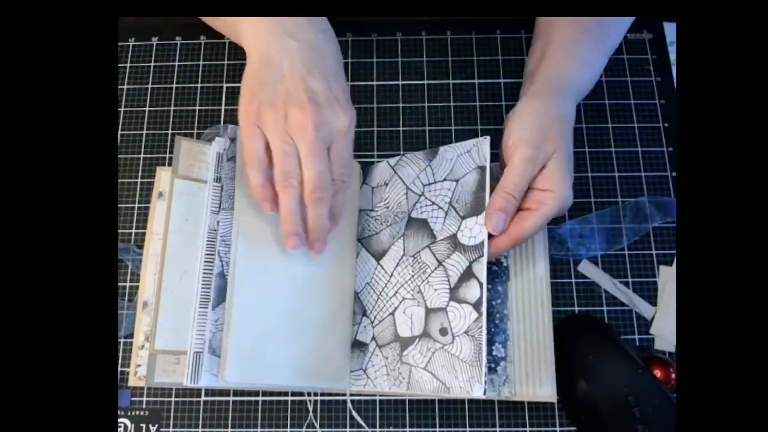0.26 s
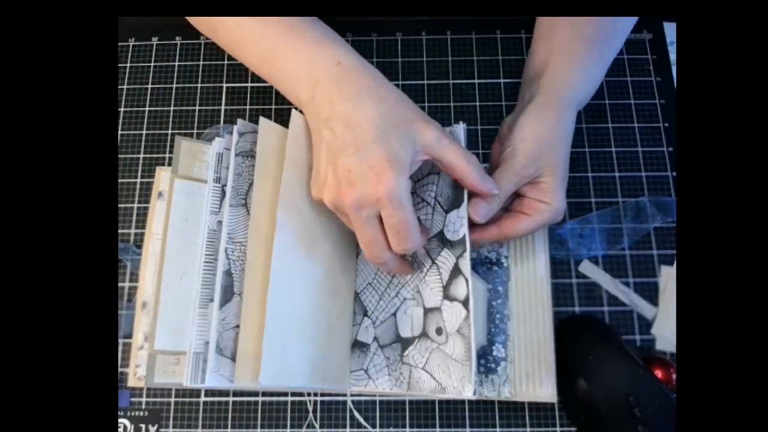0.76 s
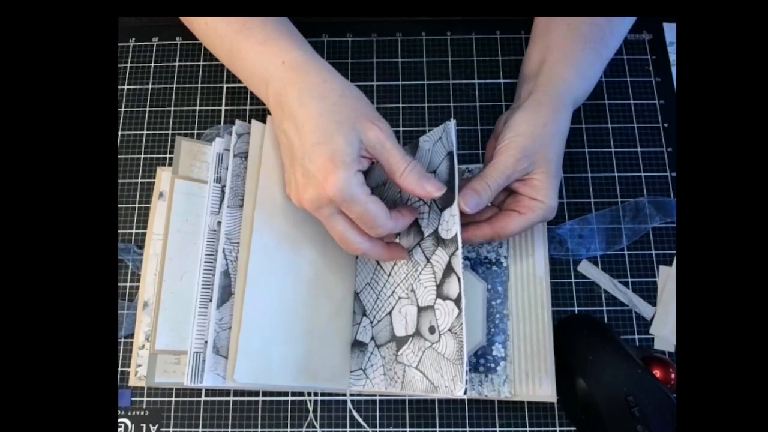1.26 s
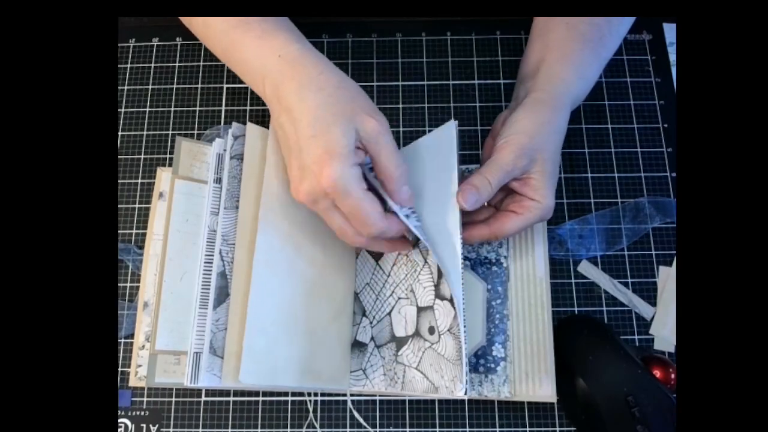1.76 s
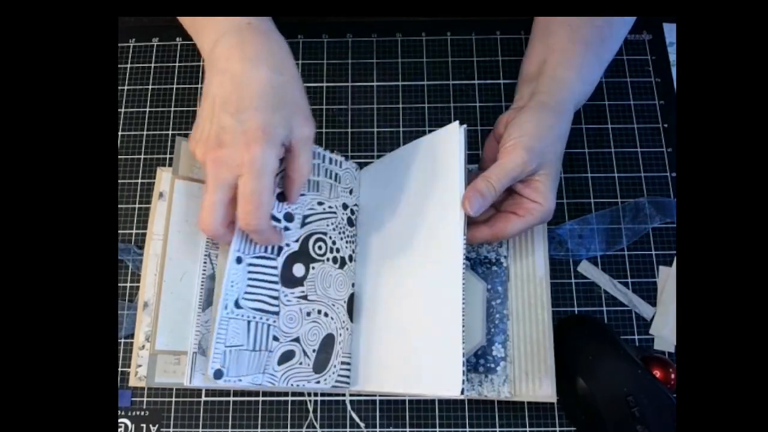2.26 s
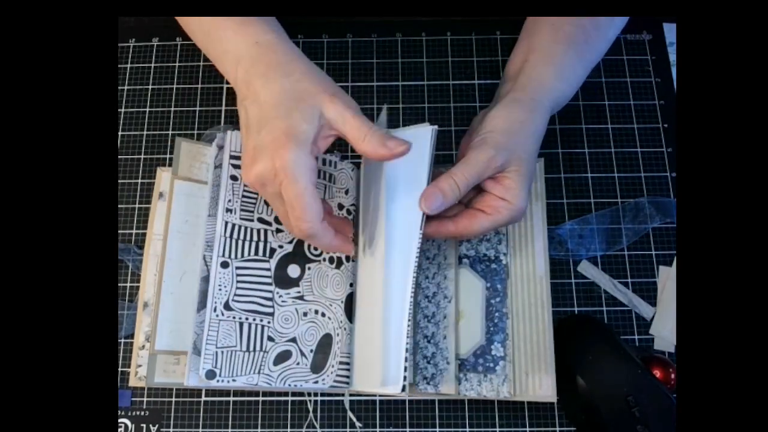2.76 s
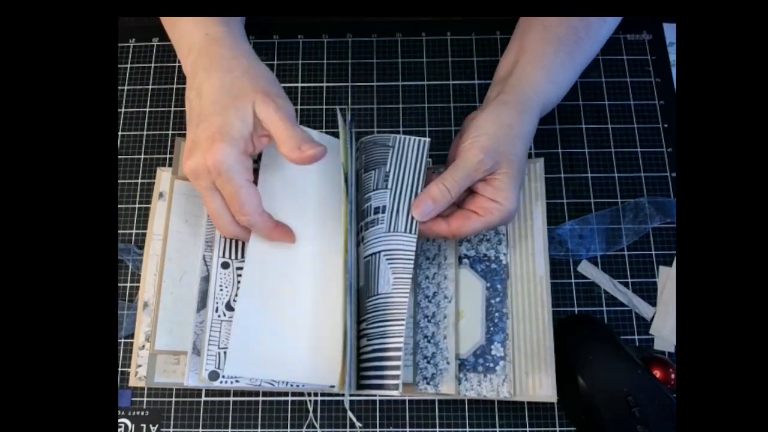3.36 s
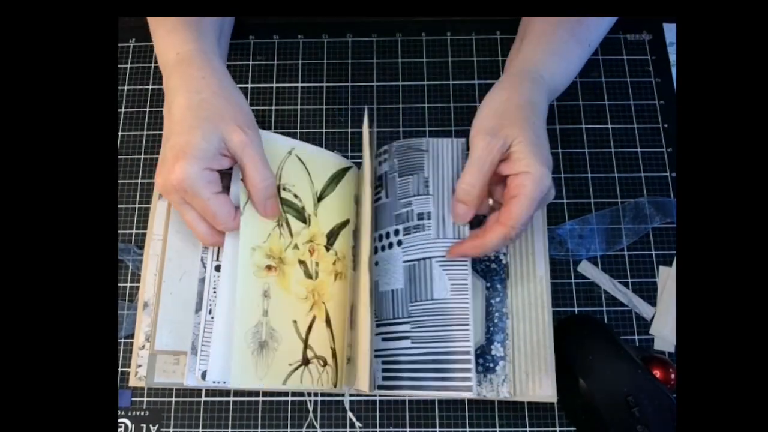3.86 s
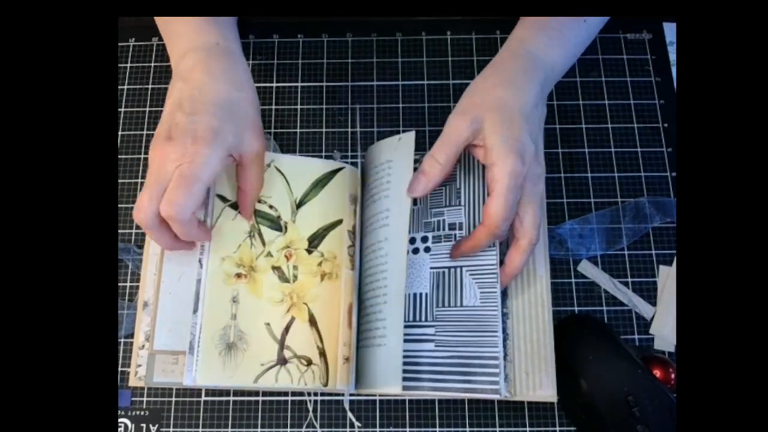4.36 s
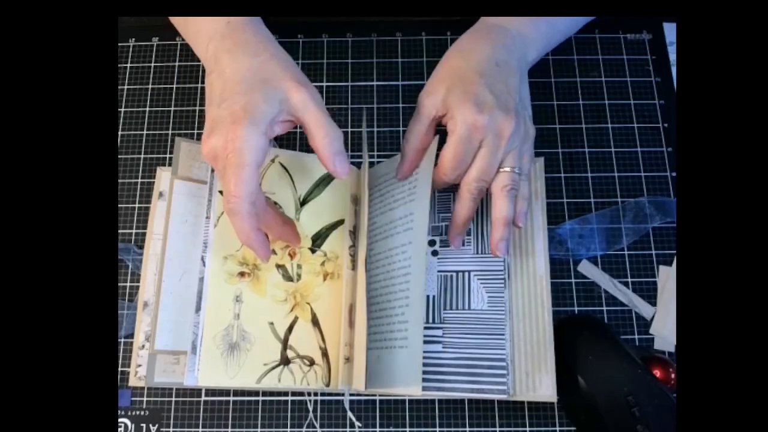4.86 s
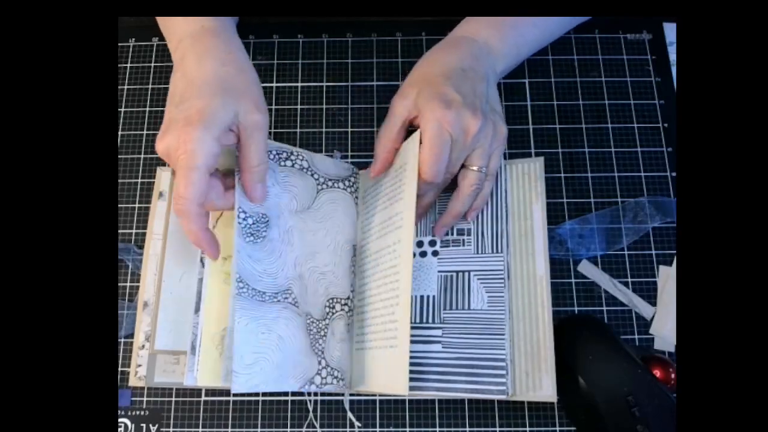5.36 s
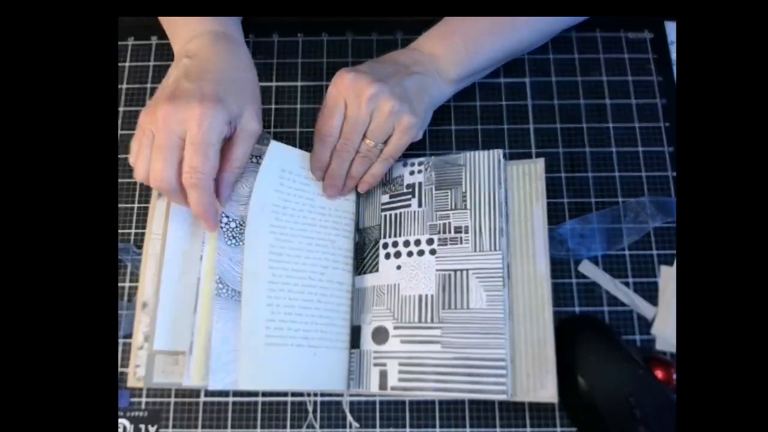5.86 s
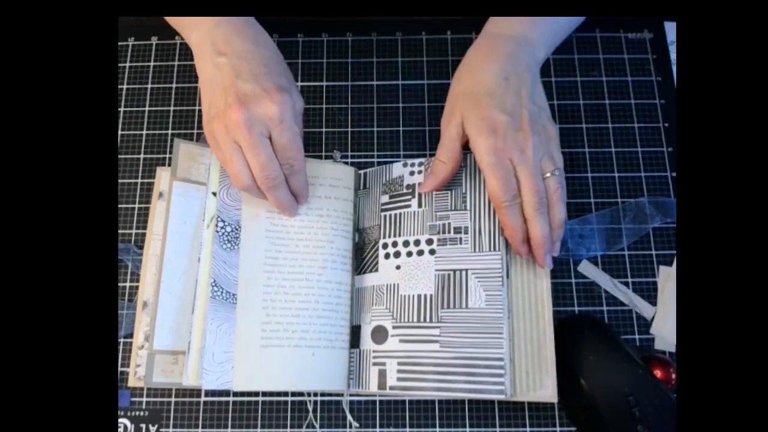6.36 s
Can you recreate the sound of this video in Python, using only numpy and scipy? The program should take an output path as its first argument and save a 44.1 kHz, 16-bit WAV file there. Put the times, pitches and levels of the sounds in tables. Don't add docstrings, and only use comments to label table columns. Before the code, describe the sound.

Stiff paper pages slide, crackle and flap in uneven bursts under a close small microphone, with sharp crease snaps and light fingertip ticks.

```python
import sys
import numpy as np
from scipy import signal
from scipy.fft import rfft, irfft, next_fast_len
from scipy.io import wavfile
from scipy.ndimage import uniform_filter1d

SR = 44100
rng = np.random.default_rng(int(sys.argv[2]) if len(sys.argv) > 2 else 0)


def output_pcm(signal):
    pcm = np.clip(np.atleast_2d(signal).T, -1, 1) * 32767
    wavfile.write(sys.argv[1], SR, np.round(pcm).astype(np.int16))


def gain_from_db(level_db):
    decades = np.asarray(level_db, float) / 20
    return 10 ** decades


N = 291501


def evened(x):
    return x / np.sqrt(np.mean(x ** 2) + 1e-20)


def read(points, hz):
    f, value = np.transpose(points)
    return np.interp(np.log(hz + 1), np.log(f + 1), value)


def ring(x, hz, width_hz):
    return signal.lfilter(*signal.iirpeak(hz, hz / width_hz, SR), x)


def steep(x, hz, width_hz):
    y = ring(ring(x, hz, width_hz), hz, width_hz)
    return y / abs(y).max()


def drift(length, size):
    wander = uniform_filter1d(rng.standard_normal(length), size)
    return evened(uniform_filter1d(wander, size))


def blotches(shape, bins, frames):
    patches = uniform_filter1d(rng.standard_normal(shape[::-1]).T, bins, axis=0)
    return evened(uniform_filter1d(patches, frames, axis=1))


def delayed(x, s):
    size = next_fast_len(N + 512)
    turn = np.exp(-2j * np.pi * np.fft.rfftfreq(size, 1 / SR) * s)
    return irfft(rfft(x, size) * turn, size)[..., :N]


def add(mix, s, sound):
    part = mix[round(s * SR):][:len(sound)]
    part += sound[:len(part)]


# t/s, sliding level/dB, sheet body level/dB, flap level/dB,
# fizz level/dB, microphone port whistle level/dB, pitch of the gap between pages f/Hz
STROKES = [
    [(0.0, -24.5, -37, -56, -34.5, 3.5, 4700), (0.042, -21, -44, -58, -22, -10, 4990),
     (0.126, -35, -31, -50, -48.5, -5, 4850), (0.244, -33, -58, -57.5, -54.5, -12, 4440),
     (0.34, -28.5, -47.5, -62, -54, -7, 4850)],
    [(0.355, -46, -66, -69, -58, -2, 5120), (0.41, -48, -66, -72, -65, -4, 5150)],
    [(0.425, -42, -53, -62, -53, 3, 5230), (0.489, -38.5, -56, -59.5, -48, 0, 5230),
     (0.56, -41, -57, -69, -50, -3, 5320)],
    [(0.575, -61.5, -68, -81, -72, 12, 4690), (0.793, -59, -72, -72, -70, -4, 4740),
     (0.961, -51.5, -72, -69.5, -69.5, 2, 4400), (1.079, -52, -65, -63, -62, 2, 4350),
     (1.195, -70, -79, -80, -76, -3, 4350), (1.281, -58, -74, -77, -79, 3, 4750),
     (1.433, -54.5, -77, -74, -85.5, 11, 4500), (1.67, -66, -79, -71.5, -73, 3.5, 4720)],
    [(1.69, -66, -81, -74, -70.5, 13.5, 5040), (1.746, -30, -61.5, -60, -53.5, -5, 5280),
     (1.856, -24, -44, -58, -30.5, -18, 5050), (1.906, -18.5, -39.5, -43.5, -41, -11, 4650),
     (1.974, -22, -26.5, -38, -32.5, -19, 4860), (2.072, -24.5, -36, -39.5, -36, -3, 4730),
     (2.152, -33, -45.5, -44, -46, -13, 4400), (2.264, -28, -48, -54, -42.5, -12.5, 4800),
     (2.405, -24, -34, -48, -48.5, -5, 5200)],
    [(2.425, -46, -56, -60.5, -64.5, -2.5, 4700), (2.513, -50.5, -63, -57.5, -73, 1, 4560),
     (2.605, -57, -70, -67, -72.5, -9, 4760), (2.731, -60.5, -84, -85, -86, 5.5, 4800),
     (2.933, -61.5, -66.5, -53.5, -84, 7, 4880), (2.99, -44, -63, -61, -59, 1, 4770)],
    [(3.02, -51, -60, -45, -66, 10, 5010), (3.058, -17, -41, -49, -54, -24.5, 5300),
     (3.124, -39, -52.5, -63, -68, 20, 5520), (3.206, -42.5, -62, -59, -65, 10, 4700),
     (3.32, -55, -64, -67, -71.5, 14, 4650)],
    [(3.34, -48, -56, -71, -74, 10, 4700), (3.43, -40, -48, -70, -63, 6, 4530),
     (3.48, -56, -56, -70, -62, 20, 4700)],
    [(3.5, -49.5, -70.5, -78, -78.5, 4, 4630), (3.66, -57, -88, -69, -71, 14, 4620)],
    [(3.7, -30.5, -32, -33, -65, -4, 4440), (3.722, -22.5, -40, -40, -84, 2.5, 4500),
     (3.81, -28.5, -49, -55, -52, -5, 4960), (3.842, -28, -54, -54.5, -50, -8, 4940),
     (4.0, -37.5, -52.5, -59.5, -56.5, 14, 4350), (4.096, -36.5, -48, -55, -55.5, 2, 4840),
     (4.278, -35.5, -47, -67, -45, 4.5, 4950), (4.394, -29.5, -43, -38.5, -41, 8, 4600),
     (4.43, -37, -54, -49, -71, 9, 4640)],
    [(4.45, -45, -68, -63, -75, 3, 4740), (4.56, -47.5, -59, -55, -74, -7, 4530)],
    [(4.575, -37, -40.5, -42, -57, 17, 4600), (4.641, -33, -43, -47.5, -54, -4, 4370),
     (4.745, -27.5, -53, -44.5, -52, -9, 4940), (4.817, -28.5, -61, -64, -49, -4, 5340),
     (4.933, -33.5, -76, -72, -50, -10, 5590), (5.019, -47, -70, -62.5, -63.5, -2, 4620),
     (5.297, -59.5, -65.5, -73, -62.5, 25, 4620), (5.405, -33, -47, -58, -42.5, -7, 4870),
     (5.459, -23.5, -44, -62, -41, -4, 4520), (5.577, -24.5, -47, -68, -47.5, -5, 4600),
     (5.657, -38, -47.5, -76, -54, 12, 4450), (5.847, -18.5, -43.5, -51, -43, 1, 4650),
     (5.941, -26.5, -45.5, -59, -28, -3, 4800), (6.027, -52, -44, -59, -73, -1, 4640),
     (6.143, -46, -62, -66, -70, 7, 4360), (6.19, -37.5, -54, -55, -69, -1.5, 4330)],
    [(6.21, -63, -75.5, -71, -72, 14, 4630), (6.468, -69.5, -71, -74, -84, 21.5, 4580),
     (6.61, -62, -84, -83, -79, 15, 4670)],
]
# f/Hz, level/dB (per Hz)
PAPER_RESPONSE = [(120, -29.5), (300, -11.5), (700, -0.5), (1050, 2), (1400, 4), (2300, 6.5), (3200, 7),
                  (3700, -2), (4500, 0), (5200, -1.5), (6000, 0), (6800, 13.5), (8000, -7)]


def rustle(hump_db=7.5):
    slips = rng.standard_normal(N) * gain_from_db(1.2 * drift(N, size=200))
    hz, t, z = signal.stft(evened(slips), SR, nperseg=256, noverlap=192)
    s, *columns = np.transpose(sum(STROKES, []))
    slide_db, body_db, flap_db, fizz_db, whistle_db, gap_hz = (np.interp(t, s, c) for c in columns)

    flap = read([(1300, 1), (2000, 0)], hz)
    fizz = read([(5600, 0), (6600, 1)], hz)
    slide = read([(3200, 0), (4000, 1)], hz) - fizz
    body = 1 - flap - fizz - slide
    port = np.exp(-((hz - 4660) / 200) ** 2)
    field_db = np.outer(slide, slide_db) + np.outer(body, body_db) + np.outer(flap, flap_db)
    field_db += np.outer(fizz, fizz_db) + np.outer(port, whistle_db)
    field_db += hump_db * np.exp(-((hz[:, None] - gap_hz) / 600) ** 2)

    grains = 2.2 * blotches(z.shape, bins=10, frames=2)
    patches = 2.8 * blotches(z.shape, bins=3, frames=36)
    field_db += (1 - .6 * port[:, None]) * (grains + patches)
    z = z * gain_from_db(field_db + read(PAPER_RESPONSE, hz)[:, None] + 3)
    return signal.istft(z, SR, nperseg=256, noverlap=192)[1][:N]


# t/s, peak level/dB, ring f/Hz, body f/Hz, body level/dB, t60/s
CREASES = [(0.032, -4.5, 4350, 3360, -36, 0.056), (0.0381, -1.5, 5400, 3360, -33, 0.043),
           (0.0564, -22, 5200, 3350, -8, 0.04), (0.0854, 5.5, 5000, 2200, -11, 0.015),
           (0.0917, -1, 4840, 2200, -5, 0.036), (0.0996, -0.5, 4240, 2770, -6.5, 0.059),
           (0.1174, -20.5, 5000, 2280, 5, 0.037), (0.2304, -26, 5140, 3400, -21, 0.03),
           (0.2875, -15, 4420, 3230, -30, 0.051), (0.3033, -20, 5400, 1930, -21, 0.048),
           (0.3273, -18.5, 5230, 3330, -31, 0.035), (0.4202, -26, 5900, 3150, -23, 0.04),
           (0.4484, -25, 5200, 2874, -25.5, 0.042), (0.5173, -26.5, 5400, 3340, -17, 0.046),
           (0.7346, -18.5, 5020, 3360, -20, 0.058), (0.9533, -35, 4330, 2880, -22.5, 0.027),
           (1.0873, 6, 4330, 3600, -21, 0.031), (1.6847, -15.5, 4770, 2800, -18, 0.02),
           (1.695, -11, 4770, 2800, -19, 0.037), (1.7073, -18, 4850, 2770, -9, 0.084),
           (1.7353, -6, 4860, 3130, -12, 0.091), (1.7653, -4.5, 4960, 3030, -23, 0.055),
           (1.7722, -7, 4760, 3410, -15, 0.044), (1.893, -11.5, 4300, 3370, -27, 0.027),
           (1.9205, -11.5, 5270, 2830, -10, 0.053), (1.9368, -15, 4250, 2740, -2, 0.034),
           (1.9872, 4.5, 4500, 2280, -15, 0.039), (2.0178, 0.5, 4620, 3440, -17, 0.047),
           (2.0234, -1, 4750, 2260, -14.5, 0.043), (2.045, -10, 5100, 2840, -13, 0.04),
           (2.0787, -15, 5300, 1410, -24, 0.032), (2.1123, -6, 4300, 2230, -10, 0.071),
           (2.3776, -9, 5200, 3390, -16, 0.046), (2.4035, -15, 5100, 2330, -25.5, 0.047),
           (2.449, -56, 5150, 3390, -2, 0.04), (2.4636, -31, 4520, 3270, -0.5, 0.039),
           (2.9311, -10, 4690, 2480, -19.5, 0.064), (2.9628, -23.5, 4340, 2410, -18, 0.035),
           (3.0131, -27.5, 4150, 2170, -5, 0.12), (3.0968, -4, 5640, 3500, -24.5, 0.029),
           (3.2131, -29, 4630, 3290, -20, 0.043), (3.247, -26.5, 4610, 2420, -20, 0.046),
           (3.361, -29, 4530, 3500, -25, 0.047), (3.3997, -25, 4630, 3200, -12, 0.032),
           (3.7224, -14, 4400, 3360, -3.5, 0.064), (3.7598, -13, 5380, 2920, -19, 0.067),
           (3.8778, -15.5, 5100, 3380, -35, 0.036), (4.285, -18.5, 4610, 2440, -25, 0.046),
           (4.3297, -11, 4640, 3260, -14, 0.049), (4.3411, -5, 4730, 2860, -16, 0.037),
           (4.371, -7, 4600, 2760, -21.5, 0.069), (4.4009, -12, 4780, 3460, -31, 0.036),
           (4.4618, -49, 5170, 3600, -19, 0.04), (4.6034, -20, 4600, 3350, -5.5, 0.04),
           (4.6664, -13.5, 4420, 1910, -17.5, 0.038), (4.6972, -21.5, 5160, 1950, -12, 0.046),
           (4.7105, -13.5, 4360, 1920, -10, 0.035), (4.8923, -25.5, 5780, 3420, -41.5, 0.046),
           (4.9909, -25.5, 4600, 1900, -28, 0.039), (5.241, -27.5, 4700, 3290, -24.5, 0.045),
           (5.2615, -24.5, 4800, 1840, -20, 0.046), (5.2802, -17.5, 4680, 1830, -17, 0.05),
           (5.443, -26, 4330, 3400, -15, 0.036), (5.4748, -21, 4600, 3420, -26, 0.044),
           (5.6959, -15, 4430, 3270, -31, 0.042), (5.7445, -14, 4340, 3350, -30, 0.063),
           (5.8142, -10.5, 4720, 3520, -19, 0.042), (5.8387, -13, 4900, 2430, -26, 0.052),
           (5.9337, -8.5, 5470, 3700, -19.5, 0.053), (5.9568, 2, 4340, 3440, -4.5, 0.032),
           (6.1552, -17.5, 4450, 2720, -13, 0.053)]


def crumples(thump_db=-20, fizz_db=-16, spread_db=-8, rise=.05):
    out, t = np.zeros(N), np.arange(6000) / SR
    noises = rng.standard_normal((len(CREASES), 6000))
    for (s, db, hz, body_hz, body_db, t60), noise in zip(CREASES, noises):
        t60 = max(t60, .005)
        swell = (1 - np.exp(-t / (rise * t60))) ** 2
        drive = noise * gain_from_db(-60 * t / t60) * swell
        top = steep(drive, hz, 1100)
        top = top + gain_from_db(spread_db) * steep(drive, 5000, 2800) + gain_from_db(fizz_db) * steep(drive, 7310, 1500)
        body = steep(drive, body_hz, 900)
        body = body + gain_from_db(spread_db) * steep(drive, 2200, 2000) + gain_from_db(thump_db) * steep(drive, 700, 300)
        add(out, s - rise * t60, gain_from_db(db - 5.5) * (top + gain_from_db(body_db + 7.5) * body))
    return out


# t/s, peak level/dB, ring f/Hz, body level/dB, knock level/dB, ring time t/s
FINGER_TAPS = [(0.7427, -1.5, 4750, -46, -65, 0.00072), (1.0077, -7.5, 4420, -22, -29, 0.0017),
               (1.0243, -3, 4290, -42, -29.5, 0.0017), (1.0543, -15.5, 4120, -19, -31, 0.0013),
               (1.0719, -10.5, 4250, -18, -24.5, 0.00097), (1.0712, -5.5, 4360, -20, -24.5, 0.0021),
               (1.4017, -21, 4490, -16.5, -16, 0.0011), (2.6703, -45, 4870, -11.5, -0.5, 0.0016),
               (2.8879, -4, 4830, -37, -49.5, 0.001), (2.9978, -16, 4600, -16.5, -29, 0.0014),
               (3.6427, -31, 4450, -21, -38, 0.0013), (3.668, -10.5, 4150, -20, -38, 0.0016),
               (3.693, -7.5, 4370, -10.5, -26.5, 0.0015), (4.5148, -26, 5070, -4, -42, 0.0016),
               (4.57, -9.5, 4420, -18.5, -27.5, 0.0015), (6.0746, -9.5, 4400, -34.5, -24.5, 0.0027),
               (6.0918, -7.5, 4310, -39, -27, 0.0022), (6.1389, -9.5, 4260, -50, -19, 0.0021),
               (6.4034, -13, 4380, -26.5, -28.5, 0.0021), (6.4182, -12.5, 4370, -51, -24.5, 0.0026)]


def taps(scatter=0.11, t60=0.024):
    lead = 130
    out, t = np.zeros(N), np.arange(4096) / SR
    scrape = 0.78 * (t * SR / lead) ** 2
    decay = gain_from_db(-60 * (t - lead / SR) / t60)
    envelope = np.where(t < lead / SR, scrape, decay)
    noises = rng.standard_normal((len(FINGER_TAPS), 4096))
    for (s, db, hz, body_db, knock_db, ring_s), noise in zip(FINGER_TAPS, noises):
        drive = scatter * noise * envelope
        drive[lead] = 1
        knock = steep(drive, 640, 150) + .7 * steep(drive, 920, 200)
        width_hz = 2.2 / max(ring_s, .0005)
        cavity = steep(ring(ring(drive, hz, width_hz), hz, width_hz), hz, width_hz)
        tap = cavity + gain_from_db(-31) * steep(drive, 7000, 670) + gain_from_db(body_db) * steep(drive, 2190, 870)
        add(out, s - lead / SR, gain_from_db(db - 1.0) * (tap + gain_from_db(knock_db) * knock))
    return out


# t/s, peak level/dB
WRIST_BUMPS = [(0.08, -32), (0.485, -48), (1.982, -48), (2.416, -58.5), (2.693, -37.5), (2.793, -36.5),
               (3.142, -56), (3.688, -53), (4.6, -39), (5.371, -52), (5.71, -49), (5.939, -38),
               (6.101, -36), (6.395, -39.5)]


def bumps(t60=.12):
    out, t = np.zeros(N), np.arange(8000) / SR
    noises = rng.standard_normal((len(WRIST_BUMPS), 8000))
    for (s, db), noise in zip(WRIST_BUMPS, noises):
        push = noise * gain_from_db(-60 * t / t60)
        add(out, s, gain_from_db(db - 2.5) * steep(push, 140, 160))
    return out


def desk(x, t60=0.33, wet_db=-16):
    t = np.arange(8000) / SR
    tail = rng.standard_normal(8000) * gain_from_db(-60 * t / t60) * (t > .003)
    return x + gain_from_db(wet_db) * signal.fftconvolve(x, tail / np.linalg.norm(tail))[:N]


# f/Hz, level/dB (per Hz)
ROOM_TONE = [(20, -6.5), (100, -4), (300, -12), (600, -25), (1400, -29), (3400, -37), (4200, -27),
             (4700, -11.5), (5300, -49), (7800, -32.5), (10800, -34.5), (11500, -45.5), (15500, -46.5),
             (16500, -77.5)]


def air(level_db=-50):
    hz, t, z = signal.stft(rng.standard_normal((N, 2)).T, SR, nperseg=2048)
    z = z * gain_from_db(read(ROOM_TONE, hz))[:, None]
    common, difference = signal.istft(z, SR, nperseg=2048)[1][:, :N]
    return gain_from_db(level_db - 6) * evened(common + .06 * difference * np.array([[1], [-1]]))


def scene(edge_hz=8050, port_delay_s=1.55e-5):
    paper = desk(rustle() + taps() + crumples()) + bumps()
    band = signal.firwin(201, edge_hz, window=("kaiser", 9), fs=SR)
    paper = signal.oaconvolve(paper, band, "same")
    left, right = paper + air()
    return np.array([left, delayed(right, port_delay_s)])


def low_pass(x):
    return signal.sosfilt(signal.butter(12, 15900, fs=SR, output="sos"), x)


def record(dry, copy_s=34 / 16000):
    combed = dry + delayed(dry, copy_s)
    power = uniform_filter1d(combed[0] ** 2, size=2000, origin=900)
    level = uniform_filter1d(np.sqrt(abs(power)), size=2000)
    offset = 0.026 * np.tanh(level / .2) ** 1.3
    mix = np.clip(combed + offset, -1, 1)
    return low_pass(mix)


dry = scene()
out = record(dry)
output_pcm(out)
```